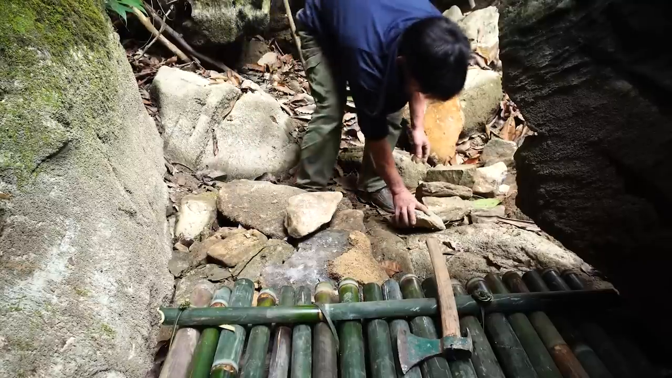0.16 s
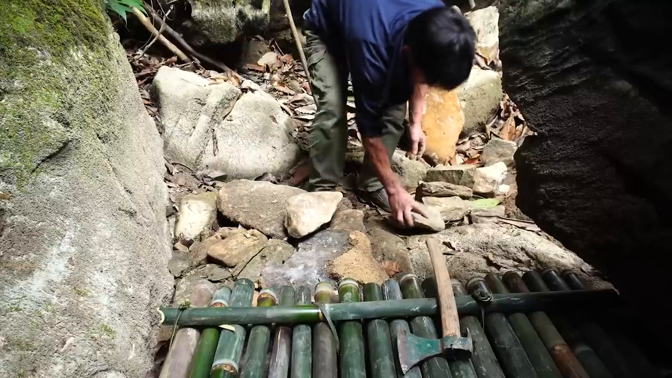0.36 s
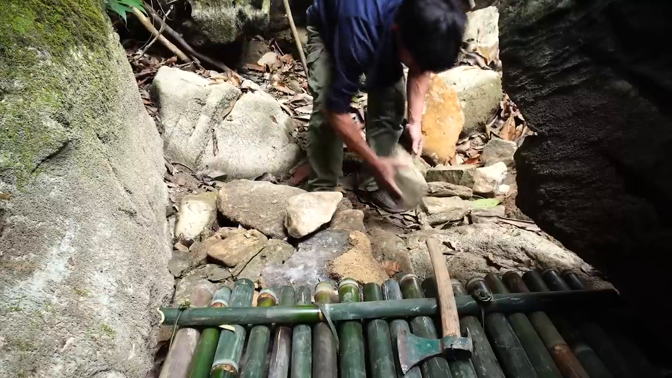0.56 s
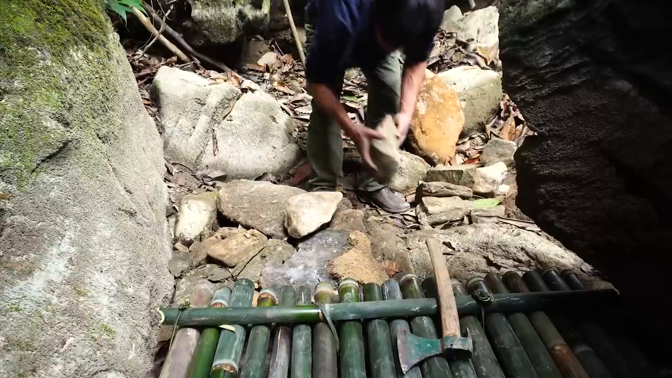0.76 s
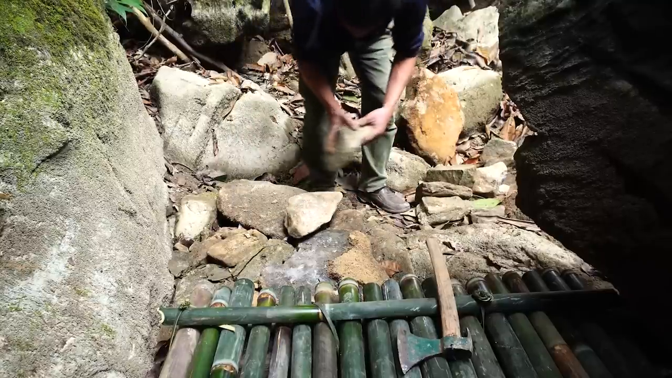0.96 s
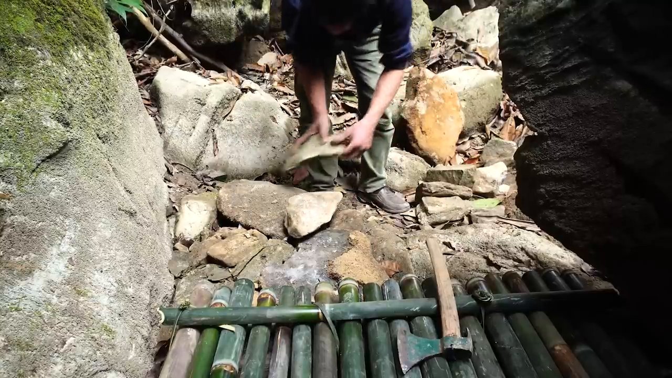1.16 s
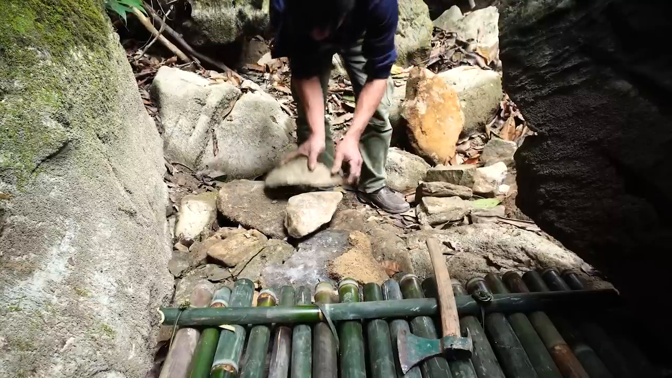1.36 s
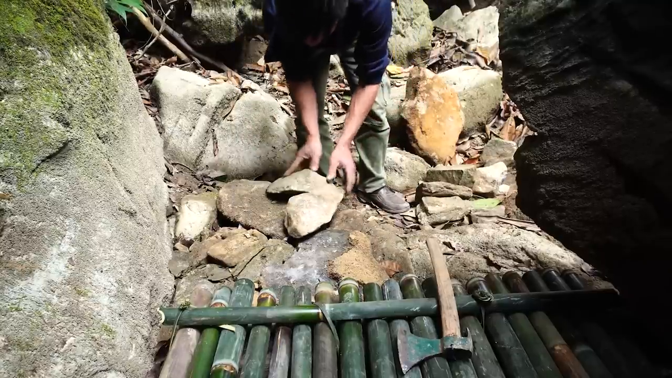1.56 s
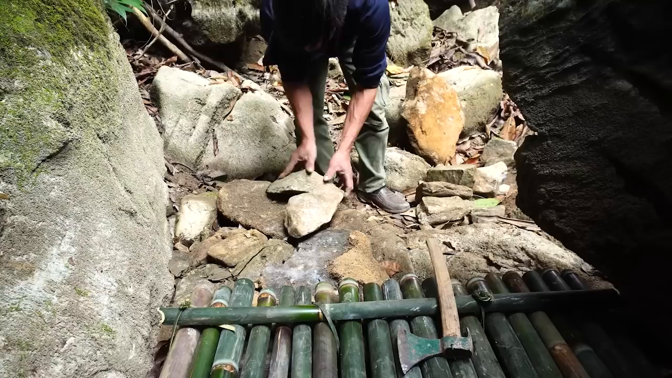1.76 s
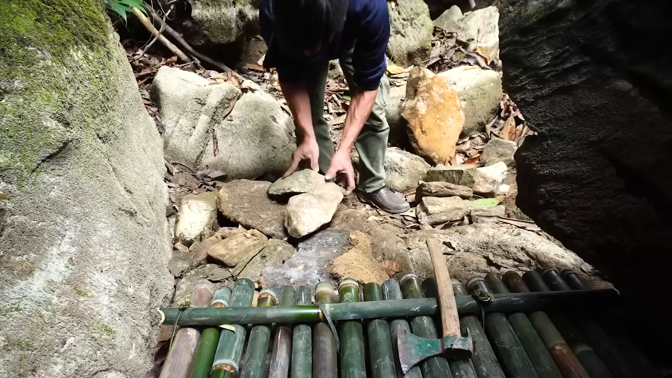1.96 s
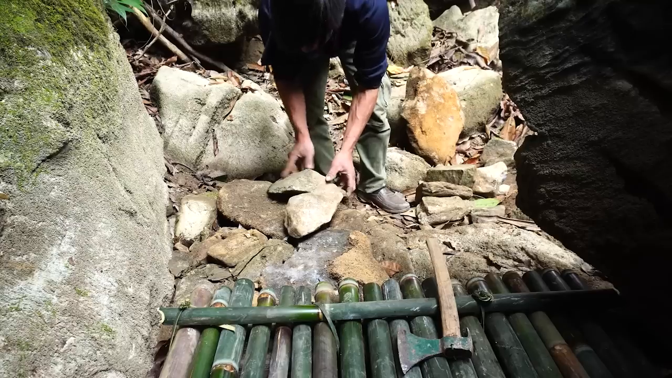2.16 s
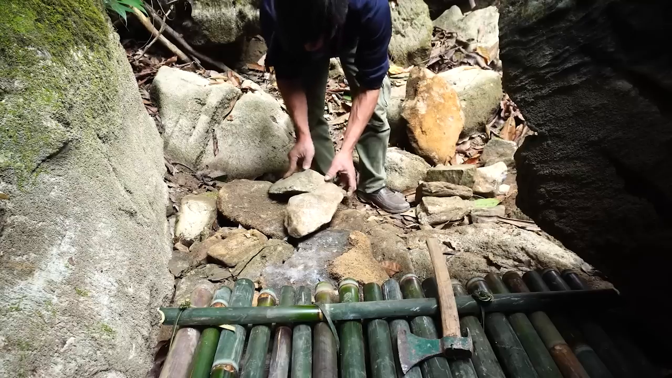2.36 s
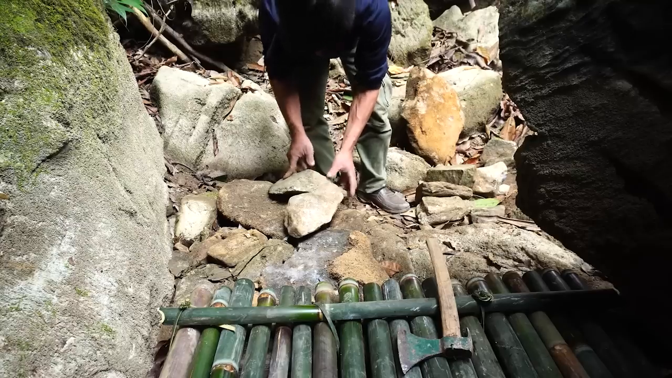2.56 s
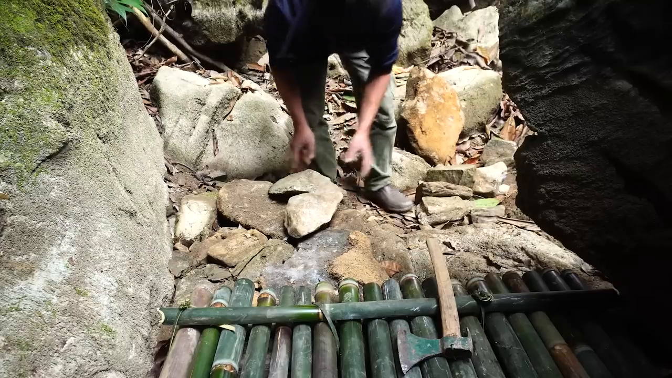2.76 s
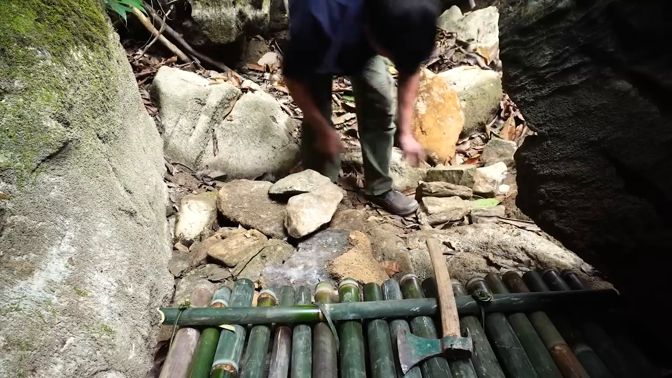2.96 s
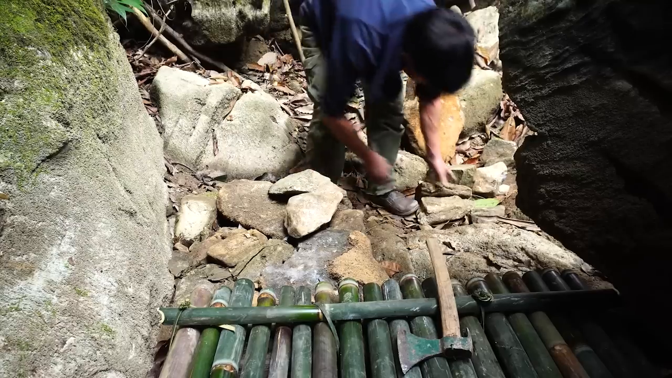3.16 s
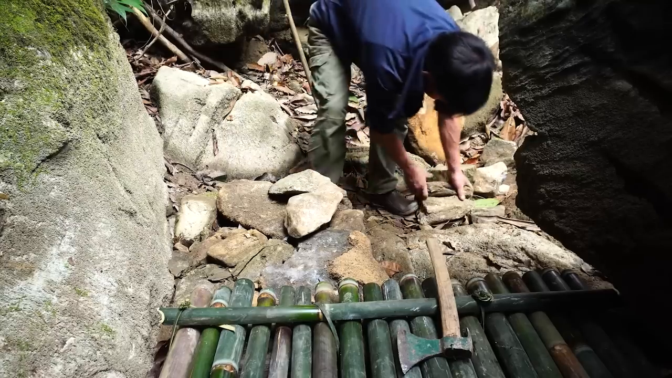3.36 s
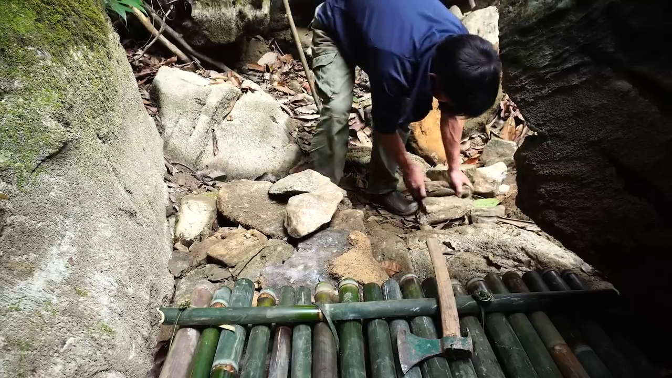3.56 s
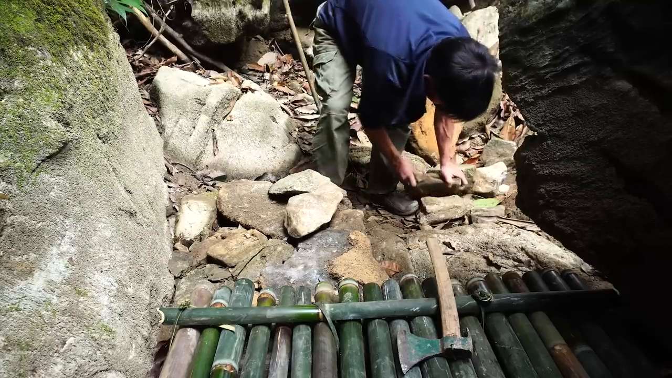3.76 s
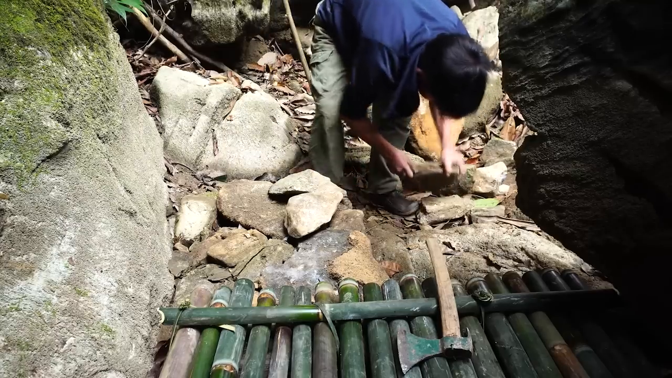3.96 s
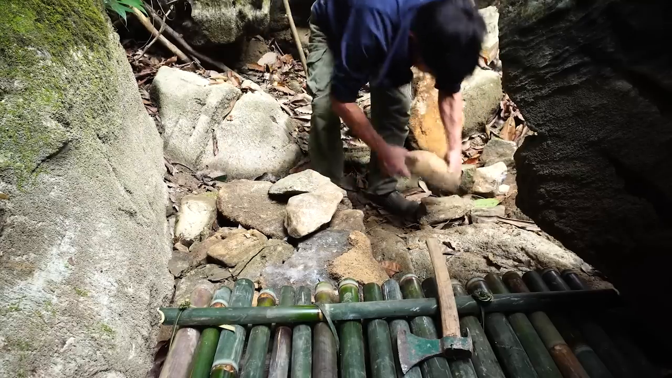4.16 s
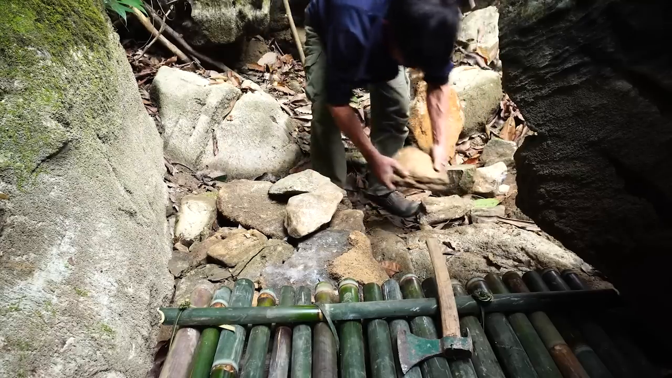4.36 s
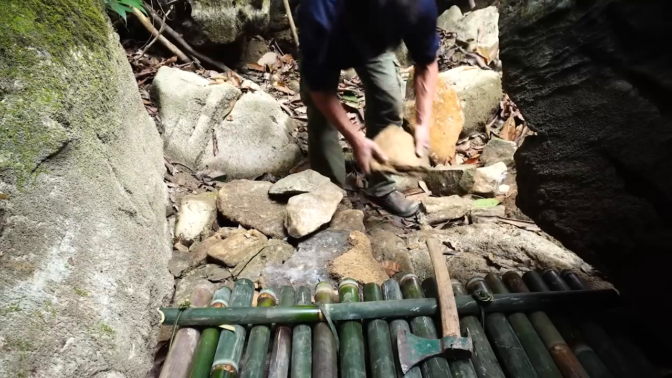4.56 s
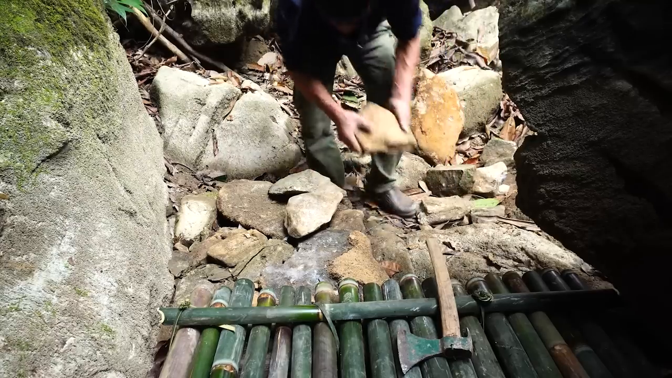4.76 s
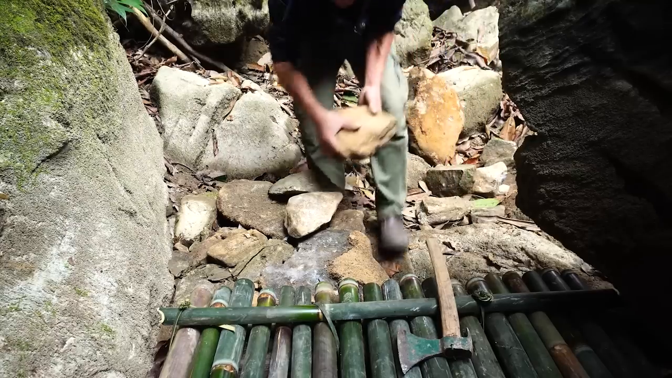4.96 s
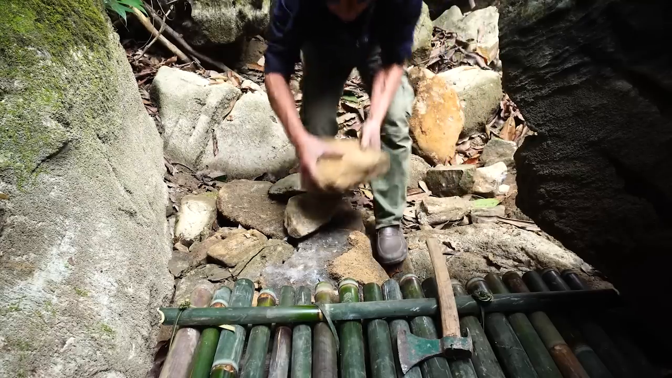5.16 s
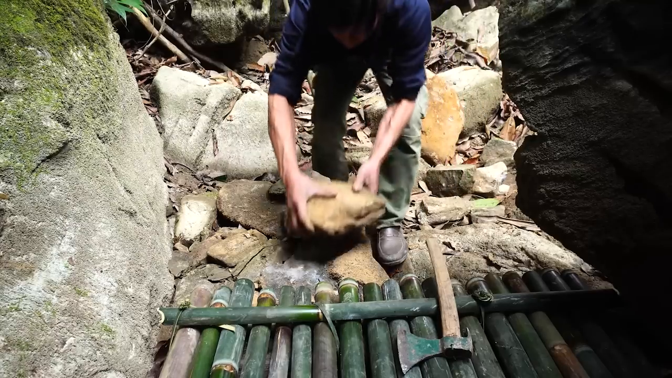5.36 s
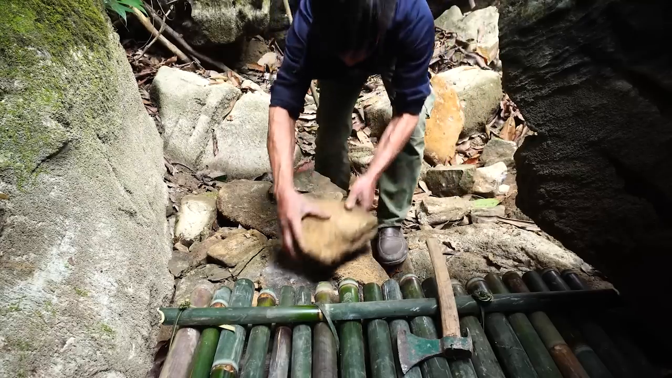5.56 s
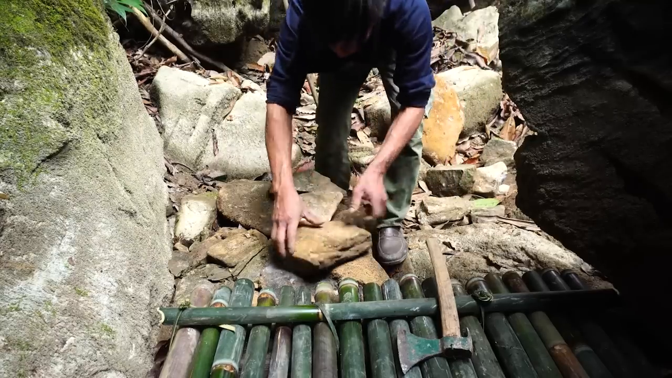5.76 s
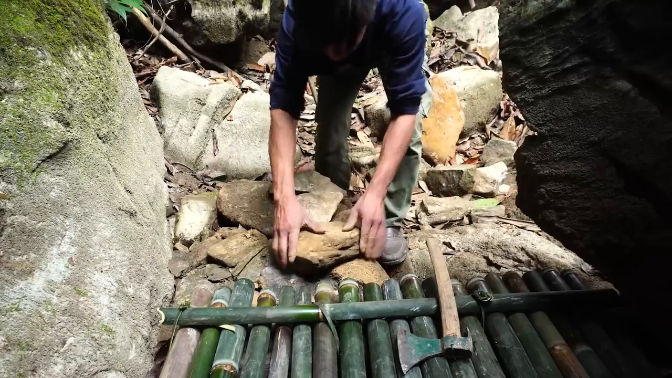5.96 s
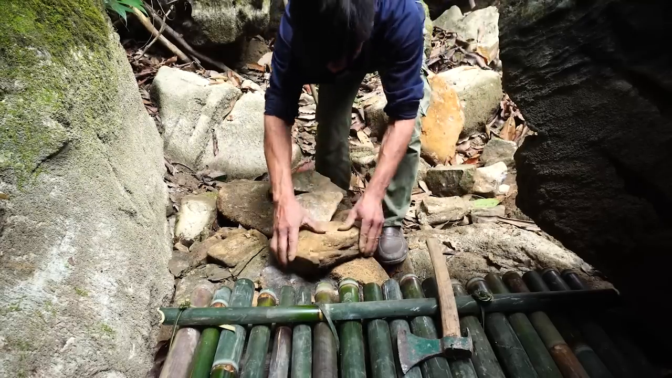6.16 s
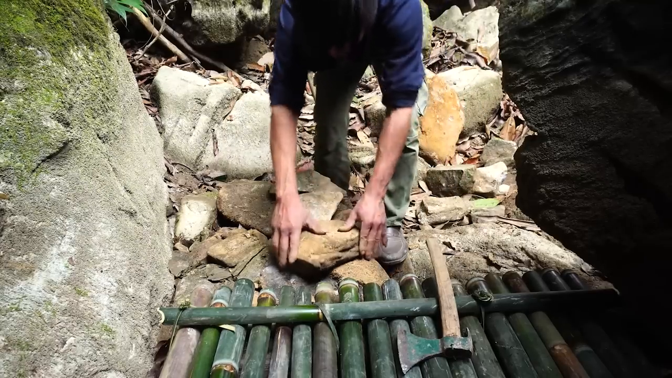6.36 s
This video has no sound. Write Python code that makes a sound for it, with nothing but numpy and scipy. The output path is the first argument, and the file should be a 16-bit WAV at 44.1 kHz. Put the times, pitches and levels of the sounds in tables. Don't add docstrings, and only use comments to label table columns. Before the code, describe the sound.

A high, steady cicada drone fills a forest spot between boulders, with one distant caller sliding upward over and over. Hands and soles rustle leaves and grit. At about a second and a half a flat stone knocks sharply on another. Faint touches and short drags follow, then a heavy stone clunks down and seats with a low thud. Close stereo microphone, dry with very short rock echoes.

```python
import sys
import numpy as np
from scipy import signal
from scipy.fft import rfft, irfft, next_fast_len
from scipy.io import wavfile
from scipy.ndimage import uniform_filter1d

SR = 44100
rng = np.random.default_rng(int(sys.argv[2]) if len(sys.argv) > 2 else 0)


def materialize(psi):
    bounded = np.clip(np.atleast_2d(psi).T, -1, 1)
    quanta = np.round(bounded * 32767).astype(np.int16)
    wavfile.write(sys.argv[1], SR, quanta)


def boost(x):
    u = np.asarray(x, float) / 20
    return 10 ** u


N = 283122
T = np.arange(N) / SR


def evened(x):
    return x / np.sqrt(np.mean(x ** 2) + 1e-20)


def read(points, hz):
    f, value = np.transpose(points)
    return np.interp(np.log(hz + 1), np.log(f + 1), value)


def over_time(points):
    return np.interp(T, *np.transpose(points))


def coloured(x, gain_at):
    size = next_fast_len(N)
    return irfft(rfft(x, size) * gain_at(np.fft.rfftfreq(size, 1 / SR)), size)[..., :N]


def high_pass(x, order, hz):
    return signal.sosfilt(signal.butter(order, hz, "high", fs=SR, output="sos"), x)


def add(mix, s, sound):
    part = mix[round(s * SR):][:len(sound)]
    part += sound[:len(part)]


def resonate(x, hz, width):
    turn = np.exp(2j * np.pi * np.cumsum(hz * np.ones(len(x))) / SR)
    r = np.exp(-np.pi * width / SR)
    return 2 * (turn * signal.lfilter([1 - r], [1, -r], x / turn)).real


# frequency in Hz, likeness from 0 to 1.
LIKENESS = [(60, 0.91), (500, 0.88), (1500, 0.6), (5500, 0.46), (9000, 0.2), (15000, 0.21)]


def spread(own):
    same = lambda hz: np.clip(read(LIKENESS, hz), 0, .999)
    shared = coloured(own[0], same)
    unshared = coloured(own[1], lambda hz: np.sqrt(1 - same(hz) ** 2))
    return np.array([own[0], shared + unshared])


def grains(shape, spread_db, share):
    click_db = spread_db * np.minimum(rng.exponential(1, (2, N)), 5)
    clicks = (rng.random((2, N)) < .03) * boost(click_db)
    noise = rng.standard_normal((2, N)) * (1 + share * evened(clicks))
    return evened(coloured(spread(noise), lambda hz: boost(read(shape, hz))))


# frequency in Hz, seconds to fall 60 dB.
ECHO_TIMES = [(100, 0.27), (400, 0.22), (800, 0.14), (3000, 0.13), (10000, 0.12)]


def boulders(x):
    size, first, gap = SR // 2, 160, 20
    slots = np.arange(first, size - gap, gap)
    at = slots + rng.integers(0, gap, (2, len(slots)))
    taps = np.zeros((2, size))
    np.put_along_axis(taps, at, rng.choice([-1., 1.], at.shape), 1)
    hz, t, bands = signal.stft(taps, SR, nperseg=128)
    fade = boost(-60 * t / read(ECHO_TIMES, hz)[:, None])
    tail = signal.istft(bands * fade, SR, nperseg=128)[1]
    tail = tail / np.linalg.norm(tail[0])
    return spread(signal.fftconvolve(x[None], tail, axes=1)[:, :N])


def tymbal(beat_hz, sharp, wander, count):
    slow_noise = uniform_filter1d(uniform_filter1d(rng.standard_normal(N), 9000), 9000)
    drift = 1 + wander * evened(slow_noise)
    beat = np.cumsum(beat_hz * drift) / SR + rng.random()
    rib = np.floor(beat * count)
    buckles = np.diff(rib, prepend=0) > 0
    strength = np.cos(np.pi * (rib % count) ** 2 / count) + 0.55 * rng.standard_normal(N)
    return buckles * strength * np.exp(sharp * np.cos(2 * np.pi * beat))


# frequency in Hz, level in dB.
CHORUS_COLOUR = [(3500, -46.5), (4400, -26.5), (4800, -15), (5050, -6.5), (5200, -5), (5600, -3.5),
                 (5800, -5.5), (6050, -6.5), (6370, -14), (6480, -9.5), (6700, -21), (7000, -23),
                 (8000, -28.5), (10000, -68)]
# time in seconds, level in dB.
CHORUS_SWELL = [(0, -43.5), (2.4, -42), (3.6, -42.8), (5.2, -41), (5.7, -42.5), (6.42, -43)]
SINGER_BEATS = [63.63, 64.07, 62.4]
# pitch in Hz, width in Hz, level in dB.
SINGER_BODIES = [
    (5380, 940, 1.5),
    (5526, 710, -2),
    (6020, 900, -5),
]
# time in seconds, dB the second singer gains and the first loses.
TURN_TAKING = [(0, -4), (1, -2), (2.2, 3.5), (3.2, -1), (3.6, -3.5), (4.05, 1.5), (4.9, 3.5), (5.3, 0.5),
               (6.1, -2), (6.42, -4.5)]


def cicadas():
    songs = []
    for beat_hz, (hz, width, db) in zip(SINGER_BEATS, SINGER_BODIES):
        buzz = tymbal(beat_hz, 0.29, .0008, count=23)
        songs.append(boost(db) * evened(resonate(resonate(buzz, hz, width), hz, 2 * width)))
    turn = boost(over_time(TURN_TAKING))
    near = songs[0] / turn + songs[1] * turn + songs[2]
    near = near + boost(-2) * boulders(near)
    near = coloured(near, lambda hz: boost(0.61 * read(CHORUS_COLOUR, hz)))
    far = grains(CHORUS_COLOUR, 1.0, 0.011)
    return boost(over_time(CHORUS_SWELL)) * evened(far + boost(3.0) * evened(near))


# time of its lowest pitch in seconds, level in dB.
SLIDE_CALLS = [
    (.38, -55),
    (1.72, -53.5),
    (3.08, -53),
    (4.5, -54.5),
    (5.86, -56),
]


def slider():
    low_hz, top_hz, bend_s = 4056, 5270, 0.1
    dip, climb = 2100, 2600
    peak_s, swell_s, fade_s = 0.22, 0.31, 0.38
    starts, levels = np.transpose(SLIDE_CALLS)
    since = T - starts[:, None]
    nearest = np.argmin(abs(since - peak_s), axis=0)
    t = since[nearest, np.arange(N)]
    slope = np.where(t < 0, dip, climb)
    hz = np.minimum(low_hz + slope * (np.hypot(t, bend_s) - bend_s), top_hz)
    db = levels[nearest] - 6 * ((t - peak_s) / np.where(t < peak_s, swell_s, fade_s)) ** 2
    drive = evened(tymbal(66, 0.59, .01, count=31)) + 2.9 * rng.standard_normal(N)
    call = boost(db) * evened(resonate(resonate(drive, hz, 660), hz, 900))
    return call + boost(-3) * boulders(call)


# time in seconds, effort in dB.
EFFORT_CURVE = [(0, 0.5), (.4, -0.5), (.6, -2.5), (1.2, -1.5), (1.5, 8), (1.68, 2.5), (1.91, -9),
                (2.41, 1.5), (2.77, 2), (3.0, 4.5), (3.36, 0.5), (3.84, 0), (4.43, 5), (4.8, -2), (5.24, 3),
                (5.6, -8), (5.87, 2.5), (6.42, -2.5)]
# start in seconds, end in seconds, leaf level in dB, scrape level in dB, grit level in dB.
DRAG_STROKES = [(1.977, 2.189, -80, -56.5, -70), (2.497, 2.686, -86, -58.5, -79),
                (2.75, 2.916, -61.5, -57.5, -54.5), (3.681, 3.814, -62, -60, -70),
                (3.795, 3.89, -57.5, -61, -59), (4.182, 4.267, -60.5, -58, -71),
                (4.778, 4.86, -62, -63, -72), (4.98, 5.11, -61, -76, -69), (5.594, 5.68, -63, -69, -73),
                (5.667, 5.751, -62, -48, -54.5), (5.764, 5.845, -69, -56, -78),
                (6.22, 6.427, -78, -59, -79)]
# frequency in Hz, level in dB.
SCRAPE_COLOUR = [(200, -29.5), (500, -9.5), (900, -4), (1600, 3.5), (2600, -1), (4000, -3.5), (7000, -25)]
LEAF_COLOUR = [(2000, -35), (4000, -0.5), (8000, 5), (10000, 5.5), (13000, -5), (15500, -5.5)]
RUMBLE_COLOUR = [(25, -41), (60, -11), (120, -16), (250, -6), (500, 4)]
GRIT_COLOUR = [(700, -33), (1500, -4), (2800, 0.5), (4000, -4), (6000, -17)]


def handling():
    effort = over_time(EFFORT_CURVE)
    scrape = boost(-61.5 + effort)
    leaves = boost(-68 + 0.33 * effort)
    rumble = boost(-95 + .4 * effort)
    grit = 0
    for start, end, leaf_db, scrape_db, grit_db in DRAG_STROKES:
        corners = [start - .01, start + 0.04, end - .015, end + 0.0074]
        stroke = np.interp(T, corners, [0.062, 1.0, 1, 0.029])
        leaves = np.hypot(leaves, boost(leaf_db) * stroke)
        scrape = np.hypot(scrape, boost(scrape_db) * stroke)
        grit = np.hypot(grit, boost(grit_db) * stroke)
    rubbing = scrape * grains(SCRAPE_COLOUR, 3.4, 0.6) + grit * grains(GRIT_COLOUR, 3.3, 1.3)
    return rubbing + leaves * grains(LEAF_COLOUR, 3.7, 0.46) + rumble * grains(RUMBLE_COLOUR, 3.1, 0.42)


# frequency in Hz, level in dB.
AIR_COLOUR = [(25, -60), (100, -39.5), (250, -19.5), (500, -11), (900, -4.5), (1500, -2), (2500, -0.5),
              (4200, -5), (7500, -12.5), (10000, -15.5), (13500, -17), (15700, -26)]


def forest_air():
    return boost(-58.5) * grains(AIR_COLOUR, 1.1, 0.0083)


def ring(hz, t60, rise=0.00034, size=5000):
    t = np.arange(size) / SR
    return boost(-60 * t / t60) * (1 - np.exp(-t / rise)) * np.sin(2 * np.pi * hz * t)


# frequency in Hz, level in dB.
CRACK_COLOUR = [(400, -20), (1000, 5.5), (2500, 6), (4300, -6.5), (6000, -6.5), (12000, -38)]


def tick(t60, shape=CRACK_COLOUR):
    t = np.arange(2000) / SR
    hz = np.fft.rfftfreq(len(t), 1 / SR)
    noise = irfft(rfft(rng.standard_normal(len(t))) * boost(read(shape, hz)))
    spit = noise * boost(-60 * t / t60) * (1 - np.exp(-t / 0.00065))
    return spit / abs(spit).max()


def blow(modes, db, pitch, hard_db, length):
    body = 0
    for hz, mode_db, t60 in modes:
        f, last = hz * pitch, t60 * length
        twin = rng.choice([-1, 1]) * ring(f * rng.uniform(1.06, 1.14), 0.8 * last, 0.0011)
        pair = ring(f, last, 0.0014) + 0.64 * twin
        body = body + boost(mode_db + hard_db * np.log2(hz / 800)) * pair
    body = body / abs(body).max()
    add(body, 0, boost(-13 + 0.4 * hard_db) * tick(0.028))
    return boost(db) * body


# frequency in Hz, level in dB, seconds to fall 60 dB.
FLAT_STONE = [(290, -26, .04), (653, -8, 0.022), (806, 7, 0.034), (1066, -6.5, 0.066), (1395, 4, 0.019),
              (1775, -4.5, 0.022), (2500, -14, 0.032), (3030, -12.5, 0.04)]
HEAVY_STONE = [(298, -26.5, 0.093), (587, 4, 0.051), (870, 10, 0.028), (1243, 4, 0.037),
               (1473, -0.5, 0.052), (1700, -9, 0.029), (2163, 0.5, 0.032), (3240, -36, 0.029)]
SEATED_STONE = [(297, -23, 0.066), (440, -5, 0.043), (719, -2, 0.076), (956, -10.5, 0.083),
                (1120, -1, 0.032), (1530, -0.5, 0.017), (1920, -23, .03), (2463, -9.5, 0.025),
                (3340, -7, 0.0086)]
# start in seconds, peak in dB, pitch factor,
# hardness in dB per octave, ring length factor.
FLAT_STONE_BLOWS = [
    (1.4946, -18, 0.9, 2, 0.5),
    (1.502, -19.5, 1.08, -3.5, 0.79),
    (1.536, -33, 0.69, -10, .51),
    (1.546, -38, 0.58, 3, 0.23),
    (1.699, -49.5, .85, 4.5, 0.7),
]
HEAVY_STONE_BLOWS = [
    (5.680, -25.5, 1.37, -2, 1),
    (5.6989, -15, 1.02, -1, 0.68),
    (5.706, -17, 1.04, -0.5, 0.29),
    (5.7166, -26.5, 1.04, 23, .51),
    (5.722, -20, 1.15, -12, 0.54),
    (5.738, -36.5, 1.2, 18, 0.29),
    (5.7406, -21.5, 1.253, -15.5, 0.63),
]
SEATED_STONE_BLOWS = [
    (5.8301, -25, 0.777, 2.3, 0.52),
    (5.8334, -14.5, 0.992, 0.74, 0.43),
    (5.851, -40, 0.97, 1.1, 0.47),
    (5.932, -43.5, 1.01, 7.7, 0.88),
    (5.939, -45, 1.36, .1, 0.65),
]


def stone_blows():
    out = np.zeros(N)
    stones = ((FLAT_STONE, FLAT_STONE_BLOWS), (HEAVY_STONE, HEAVY_STONE_BLOWS), (SEATED_STONE, SEATED_STONE_BLOWS))
    for modes, blows in stones:
        for s, *how in blows:
            add(out, s, blow(modes, *how))
    return out


# start in
# seconds, peak in dB, ring in Hz, seconds to fall 60 dB, crack in dB.
LIGHT_TOUCHES = [(2.747, -43.5, 1090, 0.051, -6), (2.815, -39, 2650, 0.03, -4), (2.86, -50, 770, .03, 10.5),
                 (4.047, -48.5, 650, 0.038, -26), (4.9, -49, 2400, .012, 3.5), (5, -52.5, 720, .04, -9),
                 (4.28, -52, 730, 0.027, -19), (4.076, -47.5, 650, 0.039, -18), (4.565, -54, 780, .03, -9),
                 (4.49, -40, 2000, 0.022, -9), (5.057, -40, 1600, 0.013, -1), (5.062, -55, 430, 0.029, -3),
                 (5.076, -45, 770, 0.024, -1), (5.086, -51, 990, .03, -3), (5.153, -51, 610, 0.025, 0),
                 (5.258, -45, 720, 0.022, -3), (6.28, -55, 620, 0.076, -2), (6.11, -50, 850, 0.019, -12),
                 (1.4946, -22.5, 2200, 0.0053, -4.5), (5.6798, -25, 1650, 0.009, -5),
                 (5.834, -22, 1250, 0.0041, -10)]


def light_touches():
    out = np.zeros(N)
    for s, db, hz, t60, crack_db in LIGHT_TOUCHES:
        add(out, s, boost(db) * (ring(hz, t60, 0.00085) + 0.42 * ring(1.4 * hz, 1.3 * t60, .0006)))
        add(out, s, boost(db + crack_db) * tick(0.037))
    return out


# start in seconds, peak in dB, pitch in Hz, seconds to fall 60 dB.
STONE_CHIPS = [(1.5015, -42.5, 8900, 0.048), (4.381, -57, 8000, .004), (4.451, -45, 9700, .006),
               (4.456, -58, 10000, .005), (4.491, -41, 8500, .006), (4.492, -46, 10500, .004),
               (4.499, -52, 8800, .005), (4.551, -48, 8500, .005), (2.83, -46, 3100, 0.011),
               (2.87, -52, 2800, .01), (5.062, -40, 3920, 0.014), (5.062, -39, 4530, 0.016),
               (5.833, -36, 3520, .01), (2.79, -58, 10000, .05)]
# start in seconds, peak in dB, seconds to fall 60 dB.
GRIT_SNAPS = [
    (1.493, -39, .015),
    (3.968, -58, .006),
    (5.057, -46, .02),
    (5.68, -26.5, 0.022),
    (5.699, -51, .02),
    (5.716, -49, .02),
    (5.737, -46, .02),
]
# frequency in Hz, level in dB.
SNAP_COLOUR = [(1500, -27), (4000, 6), (8000, 3.5), (11000, -5.5), (14000, -2), (16000, -18)]


def chips_and_snaps():
    out = np.zeros(N)
    for s, db, hz, t60 in STONE_CHIPS:
        add(out, s, boost(db) * (ring(hz, t60, 0.00008) + .5 * ring(hz, min(t60, .006), 0.00016)))
    for s, db, t60 in GRIT_SNAPS:
        add(out, s, boost(db) * tick(t60, SNAP_COLOUR))
    return out


# frequency in Hz, level in dB, seconds to fall 60 dB.
GROUND_MODES = [(101, -22, 0.12), (168.6, -11.5, 0.072), (299, 2.2, 0.059), (440, -5.5, .07)]
# start in seconds, peak in dB, pitch factor, firmness in dB per octave.
GROUND_THUDS = [(1.4968, -46, 1.08, -6), (1.54, -44, 0.78, -8), (1.549, -64, 1.05, -19),
                (2.085, -66, 1, -14), (5.063, -66, 0.88, -4), (5.081, -68, 0.89, -3), (5.685, -41, 0.98, 9),
                (5.70, -30, 0.99, 0.1), (5.721, -32, 1.026, 0), (5.745, -43, 0.905, 6),
                (5.832, -36, 0.96, -2.5), (5.842, -41, 1.01, 1), (5.95, -77, 0.84, -21),
                (6.1, -85, 1.1, -20)]


def ground_thuds():
    out = np.zeros(N)
    for s, db, pitch, firm_db in GROUND_THUDS:
        for hz, mode_db, t60 in GROUND_MODES:
            f = hz * pitch
            both = ring(f, t60, 0.0025, size=9000) + 1.2 * ring(1.404 * f, 0.5 * t60, 0.0033, size=9000)
            add(out, s, boost(db + mode_db + firm_db * np.log2(hz / 300)) * both)
    return out


def scene():
    background = cicadas() + slider() + handling() + forest_air()
    small = stone_blows() + light_touches() + chips_and_snaps()
    stones = high_pass(small, 3, 170) + ground_thuds()
    return background + stones + boost(-12) * boulders(stones)


def top_cut(x):
    return signal.sosfilt(signal.butter(12, 15720, fs=SR, output="sos"), x)


# frequency in Hz, dB the left is louder.
PORT_TILT = [(60, -1), (180, -0.5), (550, -0.5), (1650, -3.0), (4970, -3), (15000, -6.5)]
# frequency in Hz, radians the left port leads.
PORT_LEAD = [(40, .1), (125, 0.32), (250, 0.81), (600, 1.31), (2000, 1.13), (4400, 0.92), (5800, 1.24),
             (9000, 0.82), (15000, 0.27)]


def record(dry):
    half = lambda hz: boost(read(PORT_TILT, hz) / 2) * np.exp(.5j * read(PORT_LEAD, hz))
    cut = high_pass(dry, 2, 104)
    ports = coloured(cut, lambda hz: np.array([half(hz), 1 / half(hz)]))
    return top_cut(ports)


dry = scene()
out = record(dry)
materialize(out)
```